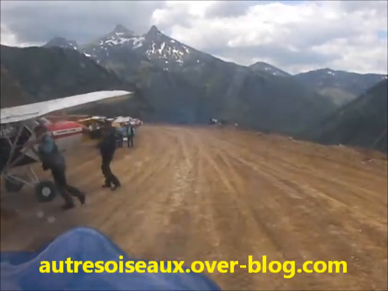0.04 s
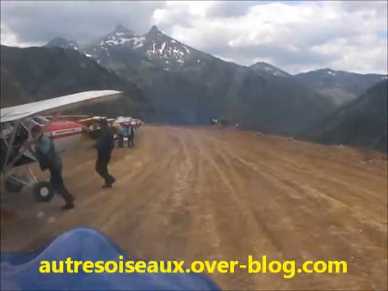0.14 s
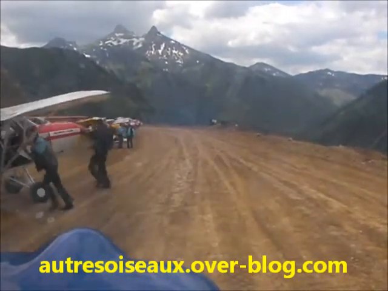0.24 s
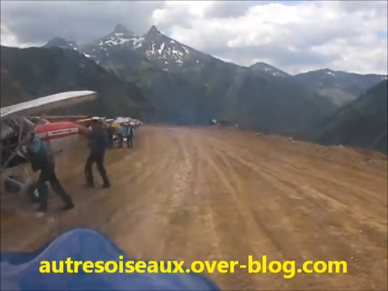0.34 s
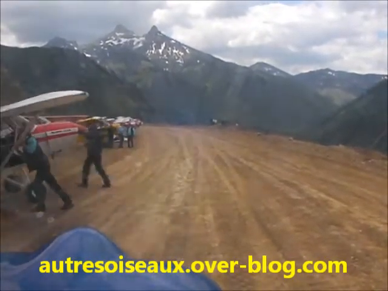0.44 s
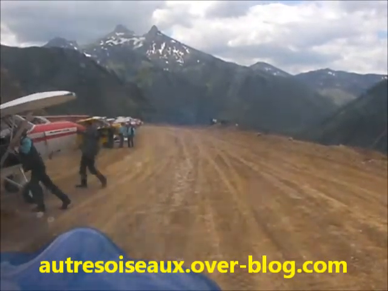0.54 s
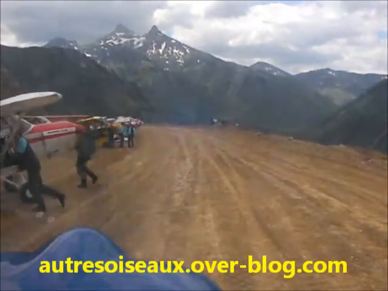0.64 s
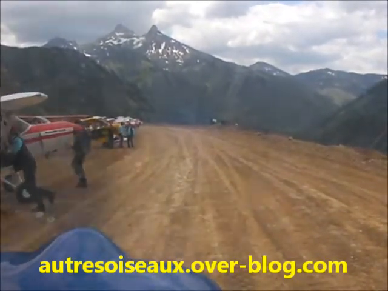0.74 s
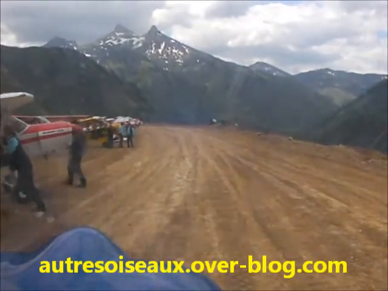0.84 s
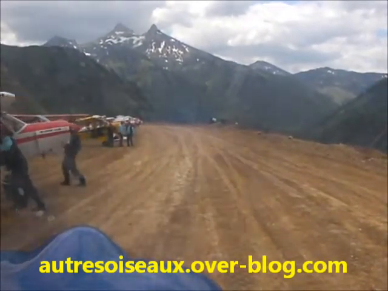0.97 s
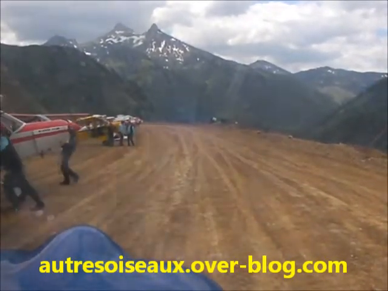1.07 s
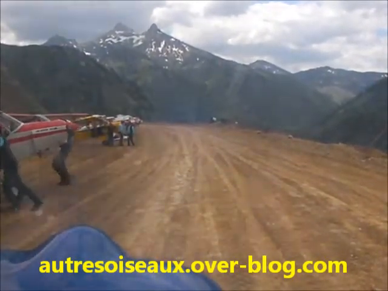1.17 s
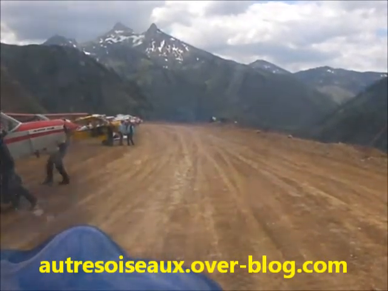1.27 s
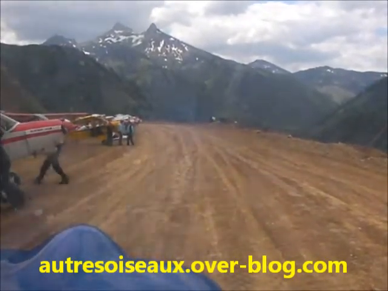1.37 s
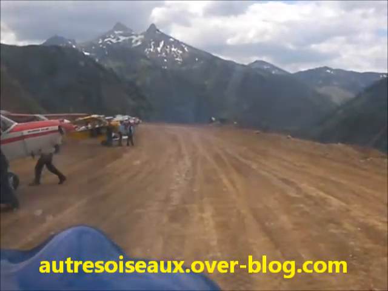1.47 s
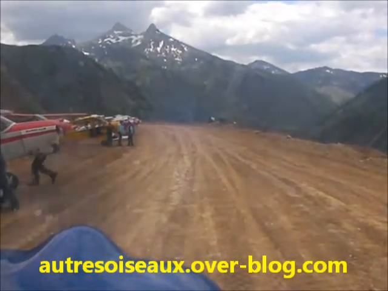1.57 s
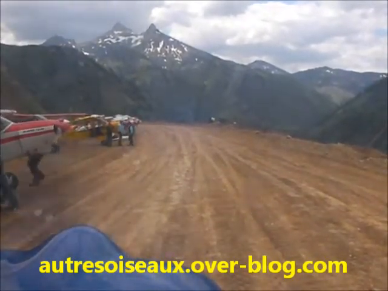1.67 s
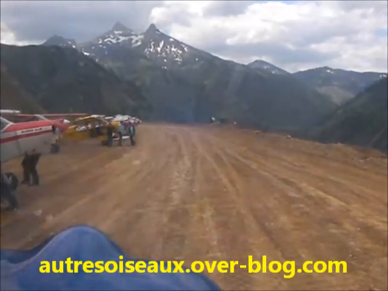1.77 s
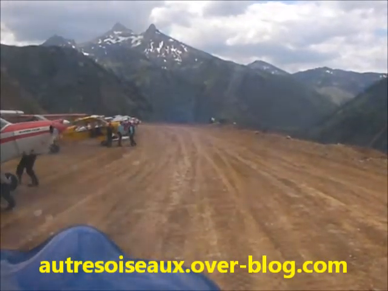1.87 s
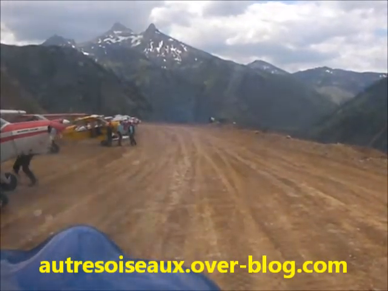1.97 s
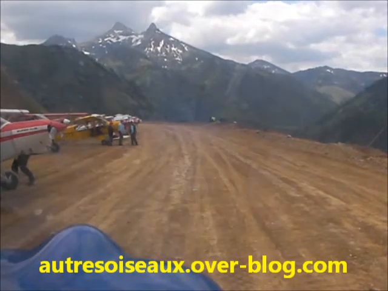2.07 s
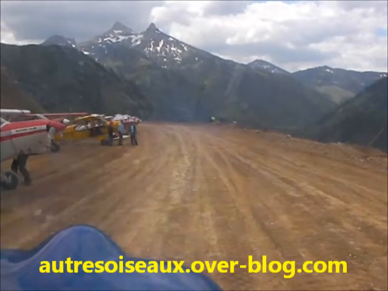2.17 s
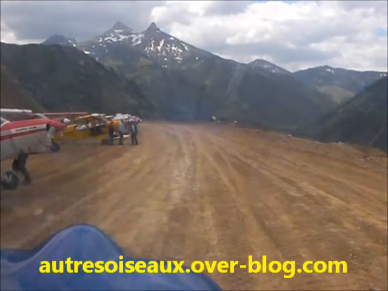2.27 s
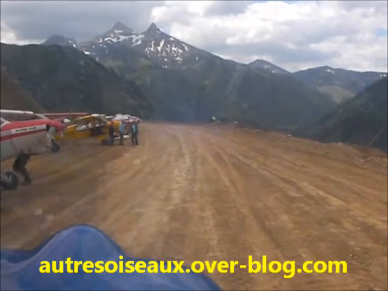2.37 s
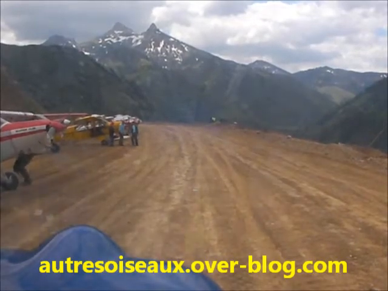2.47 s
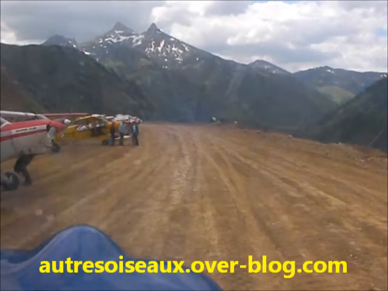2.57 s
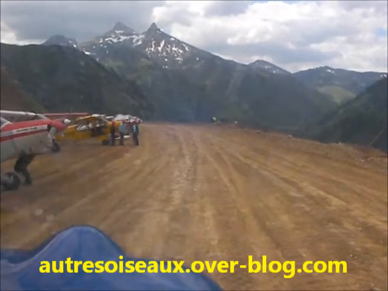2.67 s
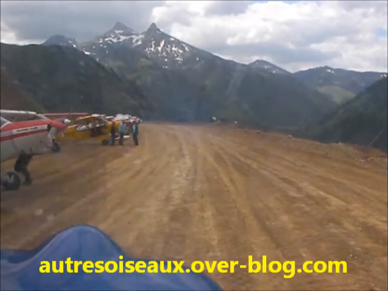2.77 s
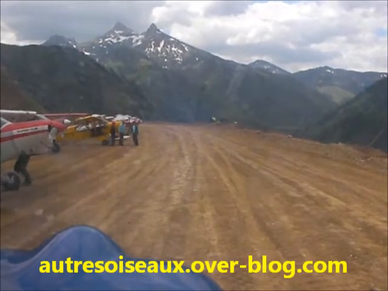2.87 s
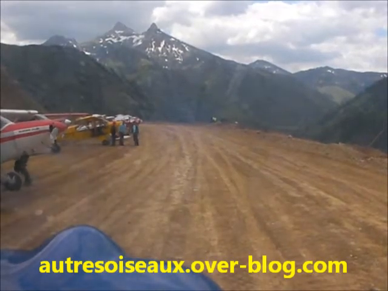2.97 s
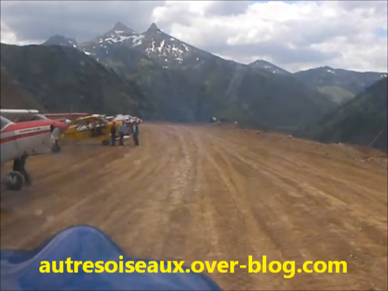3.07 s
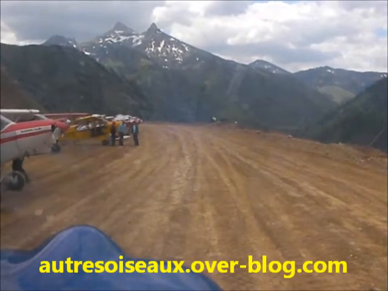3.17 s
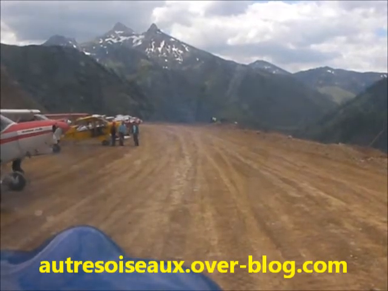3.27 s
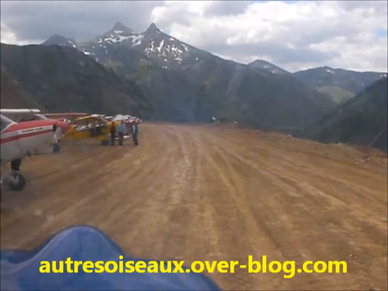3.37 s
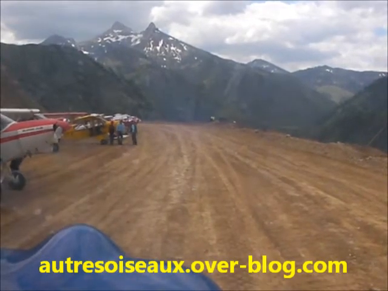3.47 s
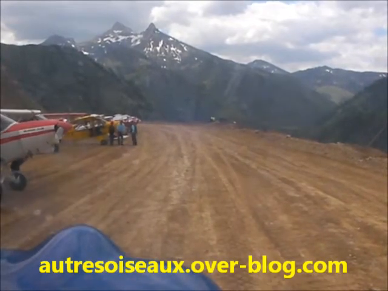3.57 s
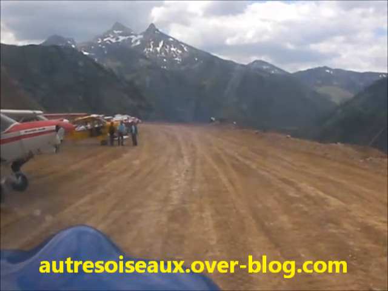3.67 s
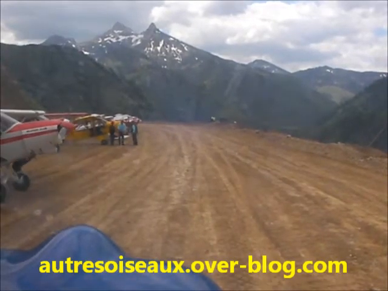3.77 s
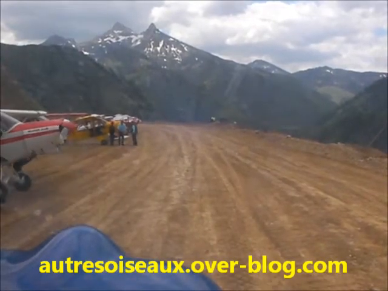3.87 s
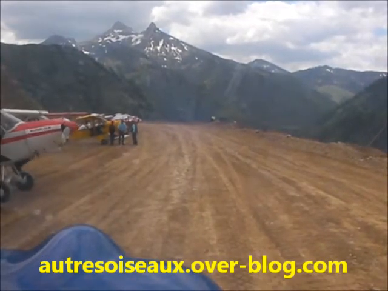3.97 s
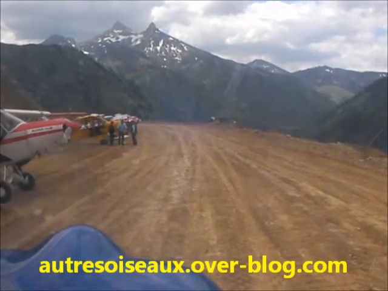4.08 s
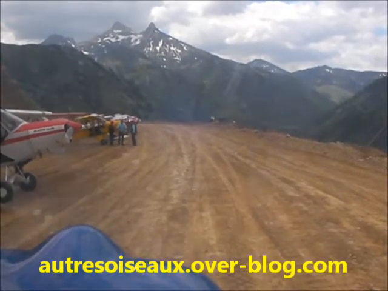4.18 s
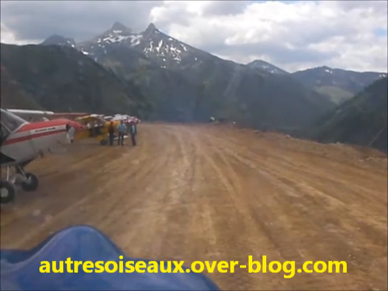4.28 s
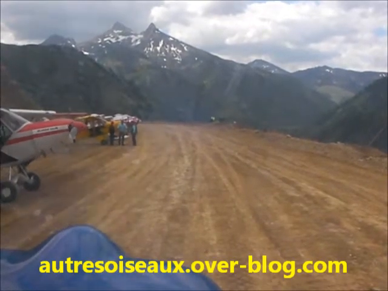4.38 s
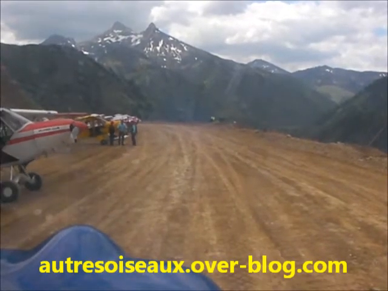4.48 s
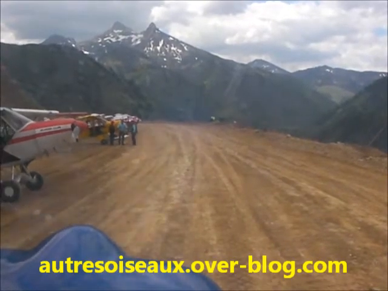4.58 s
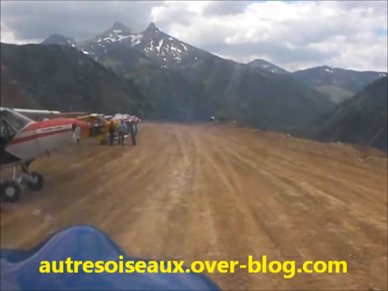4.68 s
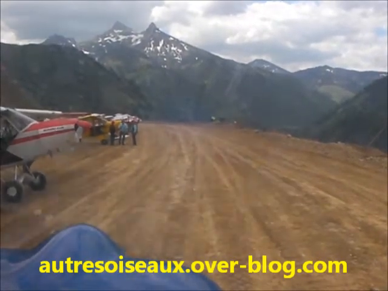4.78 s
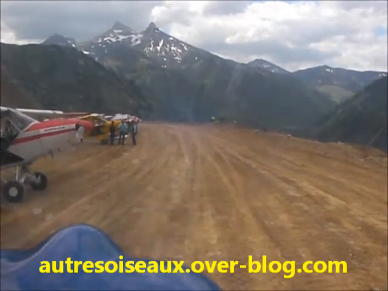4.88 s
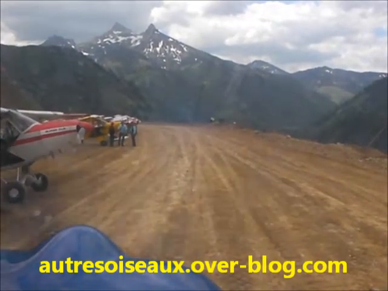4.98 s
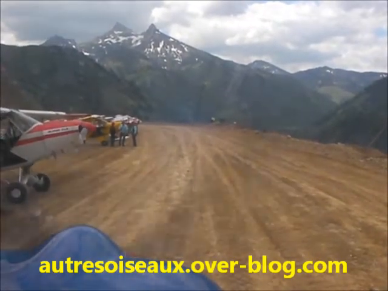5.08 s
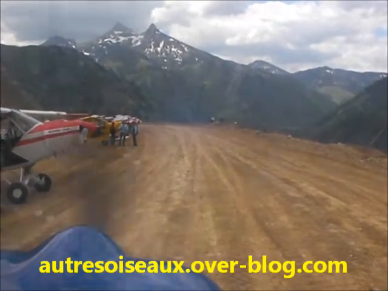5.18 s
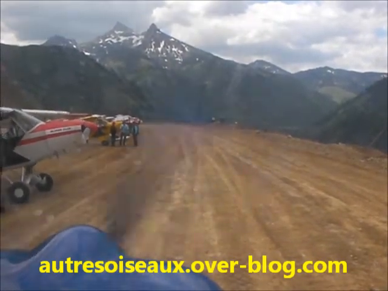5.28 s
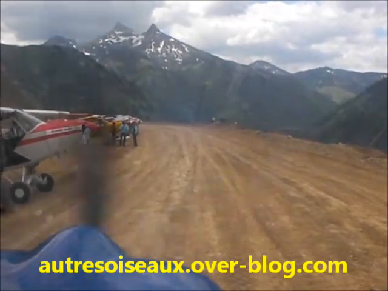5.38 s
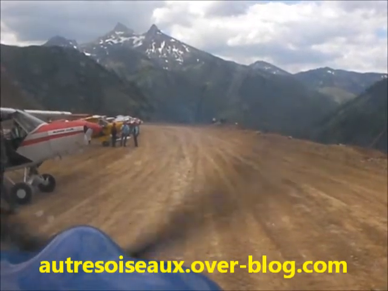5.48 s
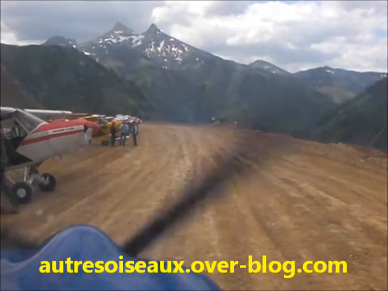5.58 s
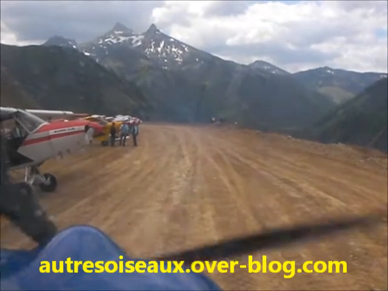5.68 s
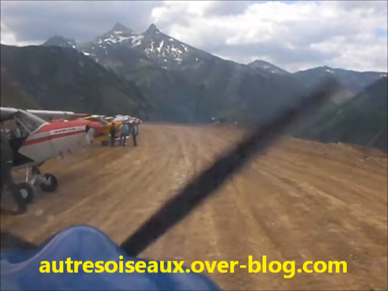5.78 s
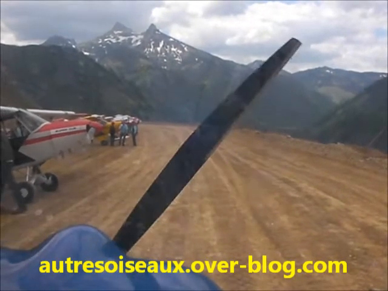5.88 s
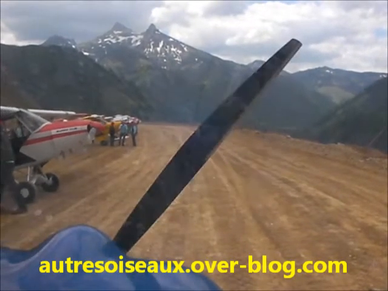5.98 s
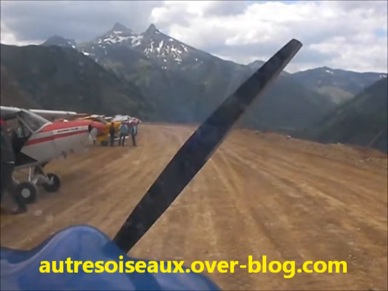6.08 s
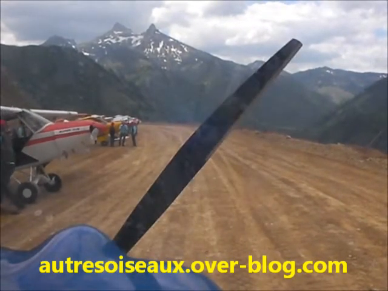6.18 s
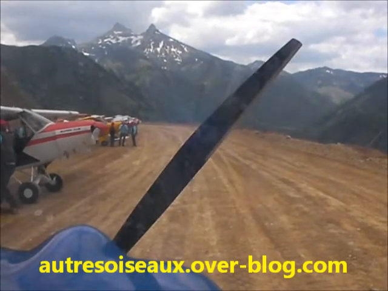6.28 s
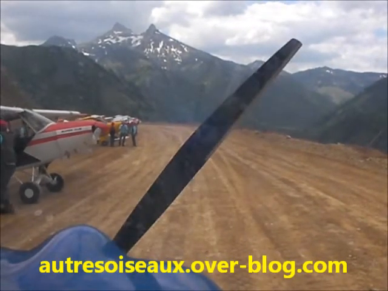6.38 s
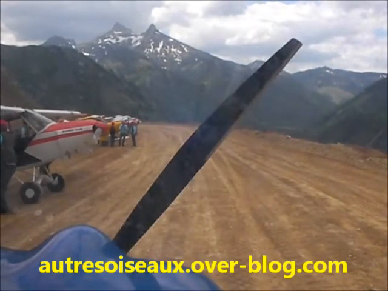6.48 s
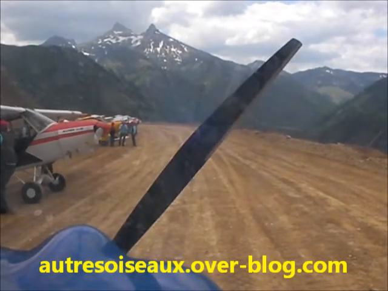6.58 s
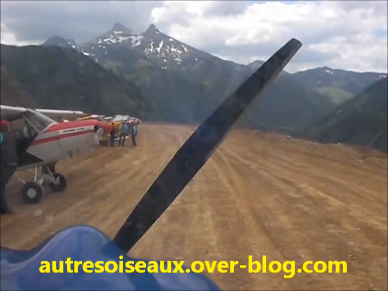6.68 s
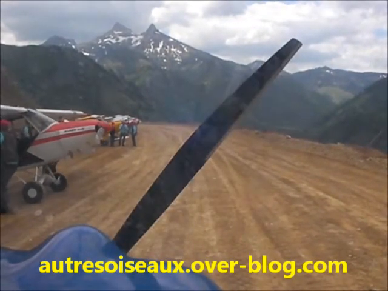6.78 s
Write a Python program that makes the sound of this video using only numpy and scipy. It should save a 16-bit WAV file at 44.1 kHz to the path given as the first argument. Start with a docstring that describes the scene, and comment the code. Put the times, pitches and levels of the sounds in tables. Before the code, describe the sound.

Heard from the seat of a small propeller plane on a dirt strip: a rough, chattering idle, then a quick climb in pitch to taxi power, boomy and buzzing. The ignition goes off, the note falls and breaks into uneven jolts, rattles and brief thin squeals. The propeller halts, the cabin goes nearly silent over faint rolling, and small clicks lead to one sharp knock with tiny rebounds.

```python
"""Inside a microlight's cockpit: a geared four-cylinder engine idles, speeds up to taxi, and is switched off.
Slack gears clatter at idle; as the propeller winds down the whole airframe shudders and rattles.
The propeller stops with a clack, the aircraft rolls on over dirt, and a few clicks and a sharp knock follow."""
import sys
import numpy as np
from scipy import signal
from scipy.fft import rfft, irfft, next_fast_len
from scipy.io import wavfile
from scipy.ndimage import uniform_filter1d

SR = 44100
rng = np.random.default_rng(int(sys.argv[2]) if len(sys.argv) > 2 else 0)


def persist_wave(psi):
    """Save psi, clipped to +-1, as 16-bit WAV."""
    counts = np.round(np.clip(psi, -1, 1) * 32767).astype(np.int16)
    wavfile.write(sys.argv[1], SR, np.atleast_2d(counts).T)


N = 301641

# the throttle is opened from idle to taxi power: (s, crankshaft turns per second)
SPEED = [(0.0, 30.5), (1.16, 30.0), (1.7, 30.4), (1.86, 31.2), (2.0, 32.85), (2.24, 39.0), (2.29, 40.2),
         (2.46, 43.0), (2.62, 44.8), (2.81, 46.8), (3.25, 48.8), (3.5, 48.9), (3.75, 48.75), (4.03, 47.3),
         (4.14, 47.3), (4.57, 45.0)]  # fixed
# (multiple of the crank speed, dB rms at idle, dB rms at taxi power)
ORDERS_DB = [(2, -39, -28), (3, -37, -49), (4, -39.5, -43.5), (5, -53, -44.5), (5.5, -48, -84),
             (6, -44.5, -31.8), (6.5, -54.5, -41.5), (7, -50, -35), (8, -53.5, -42), (9, -40.5, -45), (10, -38, -38.5),
             (10.5, -86, -39.5), (11, -31, -73), (12, -36.5, -50.5), (13.5, -46, -56), (14, -52.5, -44), (15, -39, -57),
             (16, -46, -62), (17, -45, -46), (18, -44.5, -43.5), (19, -57, -44), (20, -56, -51)]
IDLE_HZ, TAXI_HZ = 30.3, 48.0  # fixed
# what the firewall lets through of the gear whine and chatter: (Hz, dB)
FIREWALL = [(1400, 0), (1700, 2), (2300, -2), (3100, -3), (3600, 6.5), (4080, -0.5), (4300, -12), (5200, -23), (7000, -40)]
# where the slack teeth hit in each two-turn engine cycle: (turns, dB)
TOOTH_KNOCKS = [(0.241, -3.5), (.4, -1), (0.639, 4), (1.229, -3), (1.32, 5.5), (1.581, -1.5), (1.65, -1)]
# modes of the gearbox case: (Hz, dB, t60 s)
GEARBOX = [(1250, 2, 0.027), (1640, 3, 0.069), (1886, 8, 0.034), (2363, -3.5, 0.16), (2460, -1, 0.045), (3190, -1.5, 0.034), (3960, -11.5, 0.018)]
# gear whine: (multiple of the crank speed, dB rms at idle, dB rms at taxi power, dB added while speeding up)
GEARS = [(21, -41, -46.5, 7), (22, -44, -58, 3), (26, -43, -69, -7), (41, -47, -76, 0), (42, -47, -53, 6), (51, -50.5, -56.5, 0), (54, -47, -70, -8), (63.58, -45.5, -57, 2.5),
         (77.7, -53.5, -80, -2), (83.3, -52.5, -61, 1.5), (103.6, -56, -64, -4), (106.7, -66, -69, 9), (131, -56.5, -69, 1)]
# shaking of the airframe, one row each for panel boom, clatter, rattle of fittings and fizz:
# (dB at idle, dB at taxi power, dB added while speeding up, dB coasting, crank turns per second that shake it most, width of that peak in octaves, dB added there)
SHAKE = [(-38, -39.5, -1.5, -32.5, 10.16, 0.11, 5),
         (-31, -30.3, -1, -36, 18.5, 1, 11),
         (-43, -38.5, 2, -45, 17.4, 0.72, 14),
         (-58.5, -52.5, 1.5, -60, 8.3, 0.83, 10)]
BAND_HZ = [230, 750, 2400, 7000]  # centres of those four
# cabin colour under power and while winding down: (Hz, dB per Hz)
RUNNING = [(25, -22), (45, -32), (70, -7), (130, -4.5), (220, -2), (330, -3), (500, -4), (850, -1.5), (1150, -8.5), (1900, -18), (3100, -21.5), (4400, -33.5), (5600, -38.5), (7000, -50.5), (10000, -51.5), (14000, -55.5)]
SLOWING = [(35, -40.5), (60, -14), (105, -3.5), (225, -4), (356, -5.5), (480, -4), (660, -3.5), (900, -6), (1100, -8), (2000, -15.5), (3040, -19.5), (4000, -27.5), (4700, -32.5), (6450, -44), (10200, -49.5), (14000, -54)]
# cabin and panel resonances: (Hz, width Hz, dB)
PANELS = [(224, 40, 3), (313, 97, 5.5), (412, 40, -2), (503, 126, 5.5), (608, 32, -3.5), (671.6, 9.7, 6), (800, 24, 1), (1216, 58, 2.5), (1628, 22, 5.5), (2024, 85, 5), (3460, 730, 0.5)]
WIDTH = [(60, -6), (110, -32), (200, -13), (380, -19.5), (700, -21), (1290, -16), (2380, -10.5), (4400, -4.5),
         (8120, -0.5), (15000, 0.5)]  # (Hz, side over mid dB)
# jolts of the airframe: (s, peak dB, share of bass dB)
JOLTS = [(4.524, -17, 3), (4.676, -10, -2), (4.829, -6.5, -10), (4.878, -7, -12), (4.955, -7, -9), (5.06, -12, -2), (5.11, -7, -1), (5.152, -10.5, -19),
         (5.275, -9, -3), (5.312, -7.5, -18), (5.345, -11, -13), (5.378, -9, -5), (5.448, -5.5, -14), (5.53, -8, -9), (5.574, -10, -4), (5.621, -9.5, -7), (5.664, -8, 3),
         (5.742, -15, 0), (5.785, -18.5, 6), (5.813, -13.5, -2), (5.885, -11.5, -3), (5.98, -17, 9)]
# loose panels slapping: (s, dB, t60 s)
CLACKS = [(4.923, -19.5, 0.026), (4.957, -34, 0.035), (4.986, -28, 0.032), (5.02, -35, .04), (5.067, -30, 0.055), (5.087, -23.5, .05), (5.123, -27, .04),
          (5.16, -20, 0.062), (5.186, -21, 0.043), (5.191, -28, 0.031), (5.302, -26, 0.044), (5.318, -22, 0.039), (5.346, -29, 0.034), (5.37, -24, 0.044),
          (5.414, -21, .04), (5.448, -25, 0.037), (5.476, -24, 0.058), (5.528, -23, .04), (5.541, -25, 0.06), (5.686, -32, 0.051), (5.914, -25, 0.028)]
SLAP = [(100, -24), (350, 1), (650, 7.5), (1200, -6), (2000, -8.5), (3000, -10.5), (4200, -24), (7000, -52), (14000, -46)]  # (Hz, dB)
# what those panels ring with: (Hz, width Hz, dB)
LOOSE = [(436, 50, 3), (527, 30, 2), (676, 20, 1.5), (791, 19, 7.5), (900, 41, 6.5), (1150, 44, 4), (1470, 82, 4)]
# hard clicks and knocks, the last big one with its rebounds: (s, body dB, bright snap dB, t60 s)
CLICKS = [(5.502, -33, -37.5, 0.14), (5.914, -23, -30, 0.12), (6.337, -69, -49, 0.13), (6.443, -43, -72, 0.15), (6.538, -34, -56, .075), (6.572, -38.5, -57, .08), (6.589, -39, -55, .08),
          (6.6645, -17.5, -34, 0.067), (6.668, -19, -30, .022), (6.675, -28, -40, .08), (6.681, -36, -40, .1), (6.693, -32.5, -52, .11), (6.816, -51, -52, 0.09)]
# modes of the knocked fittings: (Hz, dB, t60 s)
FITTING = [(251, -7, .25), (656, 1, .11), (1200, 2, .12), (1370, -1, .09), (1690, -2.5, .13), (1770, -1, .09), (2110, 0, .1), (2450, -12, .09), (2970, -10, .08), (3260, -15, .08), (5200, -18, .08), (5400, -15, .09)]
KNOCK = [(80, -33), (200, -18), (600, 2), (950, 0), (1300, 4), (2050, 2), (3000, -9), (4200, -31), (5600, -24), (6300, -40), (14000, -42)]  # (Hz, dB)
SNAP = [(500, -30), (2500, -3), (4800, 2.5), (5700, 1), (6200, -8), (7200, -13), (10000, -5.5), (13000, -7), (15000, -23)]  # (Hz, dB)
# thin squeals: (start s, end s, first Hz, last Hz, dB rms, flutter Hz)
SQUEALS = [(4.697, 4.933, 3860, 3000, -45, 160), (4.818, 4.967, 3900, 3260, -44.5, 200), (4.919, 5.103, 3740, 3170, -51, 298),
           (5.88, 5.909, 2170, 2190, -33, 45), (6.272, 6.437, 3580, 3590, -62, 20), (6.443, 6.533, 3570, 3650, -56.5, 20)]
EDGE_HZ = 14000  # fixed
TIME = np.arange(N) / SR
HZ = np.fft.rfftfreq(N, 1 / SR)
TYRES = [(30, -30), (60, -13), (110, -4.5), (170, 1.5), (240, -1), (330, -7.5), (480, -10), (700, -9), (1000, -23), (1500, -25.5), (3000, -61), (14000, -80)]  # (Hz, dB per Hz)
HISS = [(100, -21), (900, 5), (1600, 0), (2300, -3.5), (3000, -2.5), (3700, -4), (5000, -7.5), (7000, -16.5), (10000, -17), (14000, -21)]  # (Hz, dB per Hz)
# soft scuffs in the cockpit: (s, dB, t60 s)
SCUFFS = [(0.708, -36, 0.13), (4.562, -35, 0.13), (4.835, -49, 0.17), (5.135, -44, 0.14), (5.615, -38.5, 0.27), (5.79, -45, 0.73)]
OFF_S, STOP_S = 4.57, 5.915  # the ignition is cut; the propeller stops  # fixed
COAST_S = .7  # unfired, the crank loses speed with this time constant
SURGE_HZ_PER_S = 25  # fixed
RUNDOWN_S, SETTLE_DB_PER_S = 0.49, 58  # the shaking changes over after the cut, and dies after the stop
# the wheels drop over bumps: (s, dB)
BUMPS = [(6.187, -24), (6.3, -34), (6.46, -42)]
# cabin resonances that the engine orders flare in as they sweep through: (Hz, width Hz, dB)
FLARES = [(343, 82, 6), (855, 240, 9)]
# how each firing buzzes through the engine frame: (Hz, dB)
FRAME = [(120, -25), (220, -3.5), (450, -1.5), (850, 0), (1150, -3), (1650, -7.5), (2000, -13), (2400, -15.5), (3200, -18), (4100, -34), (5500, -42), (14000, -68)]
LURCH_HZ, LURCH_S, LURCH_DB = 5.83, 5.8, 0.5  # the coasting engine lurches on its mounts: rate, time of one lurch, swing of the rattle


def amp(db):
    """Decibels to gain."""
    return np.exp(np.asarray(db) * (np.log(10) / 20))


def unit(x):
    """Scales to rms 1."""
    return x / np.sqrt(np.mean(x ** 2) + 1e-20)


def curve(rows, axis=1):
    """One column of a table, joined by straight lines in time."""
    rows = np.array(rows)
    return np.interp(TIME, rows[:, 0], rows[:, axis])


def read(points):
    """A spectrum joined by straight lines on a log-frequency axis."""
    f, db = np.transpose(points)
    return np.interp(np.log(HZ + 1), np.log(f + 1), db)


def bumps(modes):
    """The dB that a set of resonances adds to a spectrum."""
    return sum(db / (1 + (2 * (HZ - hz) / width) ** 2) for hz, width, db in modes)


def colour(x, db):
    """Filters by a gain in dB at every frequency."""
    size = next_fast_len(N + 4096)
    return irfft(rfft(x, size) * np.interp(np.fft.rfftfreq(size, 1 / SR), HZ, amp(db)), size)[..., :N]


def drift(rate_hz):
    """Smooth chance of rms 1 that changes at about the given rate."""
    knots = rng.standard_normal(4000)  # fixed
    return unit(np.interp(TIME * rate_hz * 2, np.arange(len(knots)), knots))


def ring(energy, t60):
    """Envelope of blows that each die away in t60."""
    return np.sqrt(signal.lfilter([1], [1, -amp(-120 / (abs(t60) * SR))], energy) + 1e-12)


def spread(pair):
    """Two unrelated sounds become a left and a right that differ mostly in the treble."""
    side = colour(pair[1], read(WIDTH))
    return np.array([pair[0] + side, pair[0] - side])


def crank(wander=.003):
    """Crank angle in turns, and power from 0 at idle to 1 at taxi speed; it holds through the run-down."""
    power = np.clip((curve(SPEED) - IDLE_HZ) / (TAXI_HZ - IDLE_HZ), 0, 1)
    return np.cumsum(crank_speed()) / SR + wander * drift(5), power


def exhaust(turns, power, waver_db=1.0, rough_db=1.6, level_db=0, scatter=0.63, lag=0.173, overrun_db=7.0, dying_db_per_s=27):
    """Engine orders; at idle three of them sit on a cabin resonance and throb once a turn. The note breaks up while speeding up and dies after the cut."""
    speed_hz, out = crank_speed(), np.zeros(N)
    sweeping = 4 * power * (1 - power) * (TIME < OFF_S)  # fixed
    overrun = fade_in(OFF_S, 0.16)
    for order, idle_db, taxi_db in ORDERS_DB:
        db = idle_db + power * (taxi_db - idle_db) + (waver_db + rough_db * sweeping) * min(order / 8, 1) * drift(9)
        if order > 7:  # fixed
            db += sweeping * sum(gain / (1 + (2 * (order * speed_hz - hz) / width) ** 2) for hz, width, gain in FLARES)
        if 5 < order < 10:  # fixed
            db += overrun * (overrun_db + 2 * drift(18))  # unfired, the cylinders pump with an uneven falling note
        offset = scatter * rng.standard_normal() + np.pi * (order < 8) * rng.uniform(-1.0, 1)
        out += amp(db) * np.cos(np.pi * round(2 * order) * (turns + lag) + offset)
    firing = amp(level_db - dying_db_per_s * since(OFF_S))
    return np.sqrt(2) * colour(out * firing, read([(15, -63), (35, -22), (48, -13), (60, -0.5), (200, -0.5)]))


def gears(turns, power, backlash=0.0017, throb=0.18, flutter_hz=17, clean=1.0, level_db=0, patchy_db=2.2, mesh_hz=23, slack_db_per_hz=4):
    """Meshing teeth whine and throb once a turn; speeding up brings the lines out in patches, and below the meshing speed they go quiet."""
    angle = turns + backlash * (1 - power / 2) * drift(20) + 0.001 * np.sin(2 * np.pi * turns)
    out, speeding, load = np.zeros(N), surge(), np.sqrt(power)
    for order, idle_db, taxi_db, surge_db in GEARS:
        rate_hz, phase = flutter_hz * max(order / 70, 1) ** 3, 2 * np.pi * round(order) * angle
        steady = clean * min(70 / order, 1) ** 2
        tone = (np.sqrt(2) * steady + drift(rate_hz)) * np.cos(phase) + drift(rate_hz) * np.sin(phase)
        out += amp(idle_db + load * (taxi_db - idle_db) + speeding * (surge_db + patchy_db * drift(14))) * unit(tone)
    out = colour(out, read(FIREWALL))
    whine = amp(level_db - slack_db_per_hz * np.maximum(mesh_hz - crank_speed(), 0))
    return spread([out, out * drift(29)]) * (1 + throb * np.cos(2 * np.pi * (turns + 0.54))) * whine


def blows(turns, power, uneven_db=2.0, slap_db=0, teeth_per_s=260, loose_per_s=200, loose_db=1.5, t60=0.087):
    """Power of the rattle: a blow each firing, a gear slap each idle turn, then loose parts at random."""
    firing = np.diff(np.floor(2 * turns), prepend=0) * amp(-10.0 + uneven_db * rng.standard_normal(N)) ** 2
    slap = np.diff(np.floor(turns + 0.6), prepend=0) * (1 - power) * amp(slap_db + uneven_db * rng.standard_normal(N)) ** 2
    teeth = (rng.random(N) < teeth_per_s / SR) * amp(-9.5 + uneven_db * rng.standard_normal(N)) ** 2
    loose = (rng.random(N) < loose_per_s / SR) * amp(loose_db * rng.standard_normal(N).clip(-2, 2)) ** 2
    energy = ring((firing + slap) * (TIME < 5.6) + teeth + loose * (TIME > 4.7), t60) ** 2
    return energy / uniform_filter1d(energy, size=7000)


def airframe(turns, power, pulsed=(.4, .6, .6, .3), ring_on_s=0.053):
    """Every blow sets the panels and fittings ringing over a steady rush of propeller air; each part shakes most at its own crank speed."""
    noise, strikes = rng.standard_normal((2, N)), blows(turns, power)
    edges = [(130, 260), (420, 1400), (1400, 4500), (4500, 14000)]  # fixed
    off, speeding = fade_in(OFF_S, RUNDOWN_S), surge()
    lurch_db = LURCH_DB * np.cos(2 * np.pi * LURCH_HZ * (TIME - LURCH_S)) * (TIME < STOP_S)
    panels_db = bumps(PANELS)
    running_db, slowing_db = read(RUNNING) + panels_db, read(SLOWING) + panels_db + bumps(LOOSE)
    out = np.zeros((2, N))
    for k, (idle_db, taxi_db, surge_db, coast_db, peak_hz, octaves, peak_db) in enumerate(SHAKE):
        lo, hi = edges[k]
        band = np.interp(np.log(HZ + 1), np.log(BAND_HZ), np.eye(len(edges))[k])
        drive = noise * np.sqrt(1 + np.clip(pulsed[k], 0, 1) * (strikes - 1))
        running = (1 - off) * amp(idle_db + power * (taxi_db - idle_db) + surge_db * speeding)
        coasting = off * amp(coast_db + peak_db * passing(peak_hz, octaves) + lurch_db)
        for body_db, level in ((running_db, running), (slowing_db, coasting)):
            size = np.sqrt(np.mean(amp(body_db) ** 2 * (HZ > lo) * (HZ < hi)))
            out += level / size * colour(drive, body_db + 20 * np.log10(band + 1e-6))
    return spread(out * amp(-SETTLE_DB_PER_S * since(STOP_S + ring_on_s)))


def shudder(turns, mount_hz=53, width_hz=7, thud_db=0, lurch=0.3, running_db=-58, coast_db=-46, rock_db=6.0, rock_hz=8.8, rock_octaves=0.25):
    """The engine rocks on its rubber mounts and thuds through the floor at each compression, most in its last turns."""
    rock = unit(colour(rng.standard_normal(N), -20 * np.log10(1 + (2 * (HZ - mount_hz) / width_hz) ** 2)))
    thud = unit(colour(rng.standard_normal(N), read([(10, -36), (30, -21), (55, -13), (95, 20), (150, -3), (300, -33), (1000, -100)])))
    level_db = running_db + (coast_db - running_db) * fade_in(OFF_S, RUNDOWN_S) - SETTLE_DB_PER_S * since(STOP_S)
    rocking = amp(rock_db * passing(rock_hz, rock_octaves))
    return (rock * rocking + amp(thud_db) * thud * (1 + lurch * np.cos(4 * np.pi * turns))) * amp(level_db)


def struck(hits, body_db, rise=0.0022, crack=0.21, crack_t60=0.011):
    """Blows (s, dB, t60 s): a short crack, then a tail that scatters through a body with the given spectrum."""
    envelope = np.zeros(N)
    for s, db, t60 in hits:
        age = TIME[round(s * SR):][:SR // 2] - s
        decay = amp(-60 * age / t60) + crack * amp(-60 * age / crack_t60)
        envelope[round(s * SR):][:len(age)] += amp(db) * decay * np.clip(age / rise, 0, 1)
    return spread(unit(colour(rng.standard_normal((2, N)), body_db)) * envelope)


def knocks(jolt_db=-12, jolt_t60=0.18, jolt_rise_s=0.012, bass_db=-13):
    """Dull jolts of the slowing engine, hard clicks of fittings and controls, and a few soft scuffs."""
    jolts = struck([(s, db + jolt_db, jolt_t60) for s, db, _ in JOLTS], read(SLOWING) + bumps(PANELS) + bumps(LOOSE), rise=jolt_rise_s)
    thumps = struck([(s, db + bass + bass_db, jolt_t60) for s, db, bass in JOLTS], read([(50, -20), (130, 0.5), (250, 2), (400, -5.5), (1200, -51), (4000, -90)]), rise=jolt_rise_s)
    body = struck([(s, db, t60) for s, db, _, t60 in CLICKS], read(KNOCK), rise=0.0018) + fittings()
    snap = struck([(s, db, t60) for s, _, db, t60 in CLICKS], read(SNAP), rise=.0012)
    scuffs = struck(SCUFFS, read(SNAP), rise=0.021, crack=0)
    return jolts + thumps + body + snap + scuffs


def squeals(steady=1.8):
    """Rubbing parts sing briefly and unsteadily as things come to rest."""
    out = np.zeros(N)
    for start, end, first_hz, last_hz, db, flutter_hz in SQUEALS:
        along = np.clip((TIME - start) / (end - start), 0, 1)
        angle = 2 * np.pi * np.cumsum(first_hz + along * (last_hz - first_hz)) / SR
        tone = unit((steady + drift(flutter_hz)) * np.cos(angle) + drift(flutter_hz) * np.sin(angle))
        out += np.sqrt(abs(np.sin(np.pi * along))) * amp(db) * tone
    return out


def rolling(rumble_db=-35.0, slowing_db_per_s=8, lump_db=1.0, bump_t60=0.22, hiss_db=-59, grit_db=7.5, grit_s=6.42):
    """Tyres rumble over lumpy dirt and fade as the aircraft slows; a faint hiss rises as they reach grit."""
    tyres_db = read(TYRES) + bumps(PANELS)
    level = fade_in(OFF_S, STOP_S - OFF_S) * amp(rumble_db - slowing_db_per_s * since(STOP_S) + lump_db * drift(25))
    rumble = unit(colour(rng.standard_normal((2, N)), tyres_db)) * level
    hiss = unit(colour(rng.standard_normal((2, N)), read(HISS))) * amp(hiss_db + grit_db * fade_in(grit_s, 0.053))
    return spread(rumble + hiss) + struck([(s, db, bump_t60) for s, db in BUMPS], tyres_db, rise=0.018, crack=0)


def since(start_s):
    """Seconds gone by since a moment, zero before it."""
    return np.maximum(TIME - start_s, 0)


def fade_in(start_s, length_s):
    """Rises from 0 to 1 over the given time."""
    return np.minimum(since(start_s) / length_s, 1)


def crank_speed():
    """Turns per second: set by the throttle, then dying away freely until a compression stops the propeller."""
    return curve(SPEED) * np.exp(-since(OFF_S) / COAST_S) * (TIME < STOP_S)


def surge():
    """How hard the engine is speeding up, 0 to about 1."""
    return np.maximum(uniform_filter1d(np.gradient(curve(SPEED)) * SR, size=13000), 0) / SURGE_HZ_PER_S


def passing(peak_hz, octaves):
    """Swells to 1 and back as the coasting crank slows through a speed at which something resonates."""
    speed_hz = np.maximum(crank_speed(), curve(SPEED)[-1] * np.exp(-(STOP_S - OFF_S) / COAST_S))
    return np.exp(-(np.log2(speed_hz / peak_hz) / octaves) ** 2)


def drone(panel_hz=228, level_db=-30, peak_hz=10.7, octaves=0.34, waver=0.23):
    """One cabin panel sings at its own pitch through the last slow turns."""
    tone = (1 + waver * drift(12)) * np.cos(2 * np.pi * panel_hz * TIME + 2 * waver * drift(8))
    return unit(tone) * amp(level_db - SETTLE_DB_PER_S * since(STOP_S)) * passing(peak_hz, octaves)


def chatter(turns, power, level_db=-41, jitter=.015, uneven_db=2.5, taxi_db=-12, crack=0.87, crack_t60=0.016):
    """Slack teeth knock several times a turn, harder every other turn, and ring the gearbox case; load presses them together."""
    age = TIME[:SR // 8]
    ticks = sum(amp(db) * (np.diff(np.floor((turns - at + jitter * drift(20)) / 2), prepend=0) > 0) for at, db in TOOTH_KNOCKS)
    ticks = ticks * amp(uneven_db * rng.standard_normal(N).clip(-2, 2))
    case = sum(amp(db - 60 * age / t60) * np.sin(2 * np.pi * (hz * age + rng.random((2, 1)))) for hz, db, t60 in GEARBOX)
    snap = signal.sosfilt(signal.butter(2, [900, 3300], "band", fs=SR, output="sos"), rng.standard_normal((2, N)))  # fixed
    sound = signal.oaconvolve(ticks[None], case, axes=1)[:, :N] + crack * unit(snap) * ring(ticks ** 2, crack_t60)
    return spread(unit(colour(sound, read(FIREWALL)))) * amp(level_db + taxi_db * power) * (1 - fade_in(OFF_S, RUNDOWN_S))


def clacks(level_db=1, rise_s=0.0012):
    """Loose panels slap against their frames, thick and fast through the run-down until the propeller stops."""
    return struck([(s, db + level_db, t60) for s, db, t60 in CLACKS], read(SLAP) + bumps(LOOSE), rise=rise_s, crack=.6, crack_t60=0.018)


def buzz(turns, power, idle_db=-33.0, taxi_db=-36.5, t60=0.04, uneven_db=2.0, count=4):
    """Each cylinder jars the frame with a short ring of its own, the same at every firing."""
    age, out = TIME[:SR // 12], np.zeros((2, N))
    for cylinder in range(count):
        firings = np.diff(np.floor(turns / 2 - cylinder / count + 1), prepend=0) > 0
        jar = rng.standard_normal((2, len(age))) * amp(-60 * age / t60)
        out += signal.oaconvolve((firings * amp(uneven_db * rng.standard_normal(N)))[None], jar, axes=1)[:, :N]
    return spread(unit(colour(out, read(FRAME) + bumps(PANELS)))) * amp(idle_db + power * (taxi_db - idle_db)) * (1 - fade_in(OFF_S, RUNDOWN_S))


def fittings(level_db=-10):
    """The modes that ring on after each hard click."""
    age, out = TIME[:SR // 4], np.zeros(N)
    for s, db, _, _ in CLICKS:
        tone = sum(amp(mode_db - 60 * age / t60) * np.sin(2 * np.pi * (hz * age + rng.random())) for hz, mode_db, t60 in FITTING)
        part = out[round(s * SR):]
        part[:len(age)] += (amp(db + level_db) * tone * np.minimum(age / 0.0013, 1))[:len(part)]
    return out


def flutter(turns, panel_hz=880, width_hz=260, level_db=-33.5, peak_hz=41.5, octaves=.13, throb=.6):
    """A loose panel buzzes roughly while the engine speeds up through the rate that shakes it."""
    noise = unit(colour(rng.standard_normal((2, N)), -20 * np.log10(1 + (2 * (HZ - panel_hz) / width_hz) ** 2)))
    level = amp(level_db) * np.exp(-(np.log2(curve(SPEED) / peak_hz) / octaves) ** 2) * (1 - fade_in(OFF_S - RUNDOWN_S, RUNDOWN_S))
    return spread(noise * level * (1 + throb * np.cos(4 * np.pi * turns)))


def scene():
    """Everything as heard from the seat, slightly earlier on the left and louder on the right."""
    turns, power = crank()
    engine = exhaust(turns, power) + buzz(turns, power) + gears(turns, power) + chatter(turns, power)
    cabin = airframe(turns, power) + shudder(turns) + flutter(turns) + drone() + clacks() + knocks()
    left, right = engine + cabin + rolling() + squeals()
    return np.array([left, np.append(0, right[:-1])]) * amp([[-.35], [.35]])


def record(dry, notch_hz=7950, notch_width_hz=680):
    """The camera has a deep notch in the treble and a steep band limit."""
    notch_db = 20 * np.log10(1e-3 + 1 - np.exp(-(abs(HZ - notch_hz) / notch_width_hz) ** 3))
    return signal.oaconvolve(colour(dry, notch_db), signal.firwin(511, EDGE_HZ, window=("kaiser", 9), fs=SR)[None], "same")


dry = scene()
out = record(dry)
persist_wave(out)
```